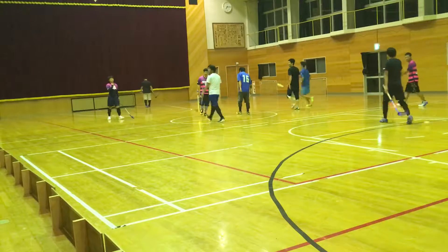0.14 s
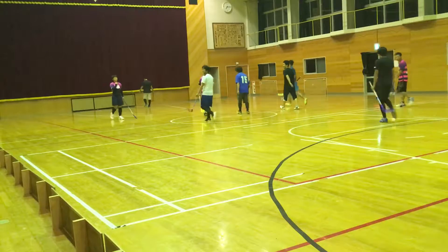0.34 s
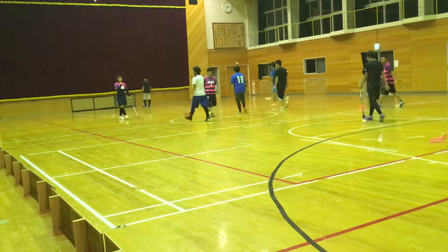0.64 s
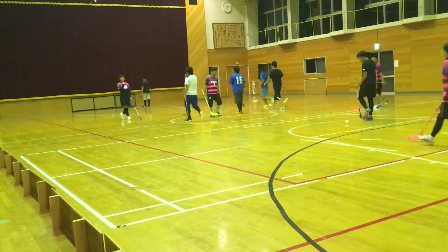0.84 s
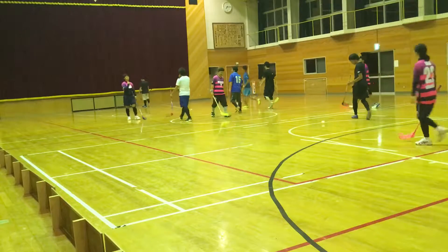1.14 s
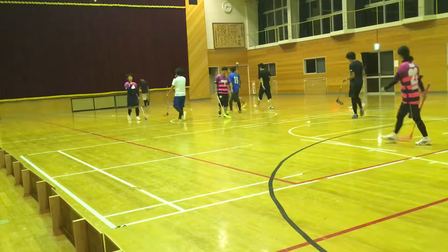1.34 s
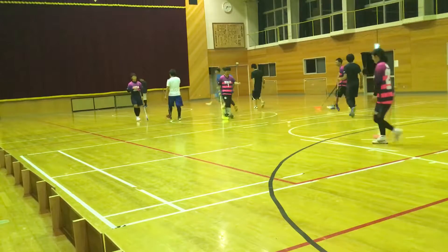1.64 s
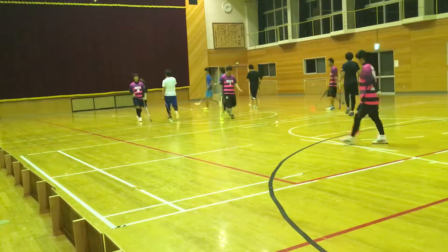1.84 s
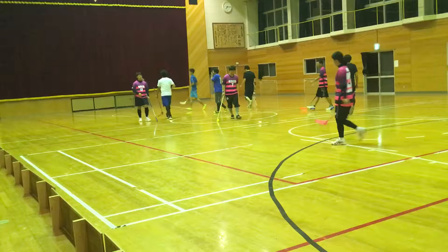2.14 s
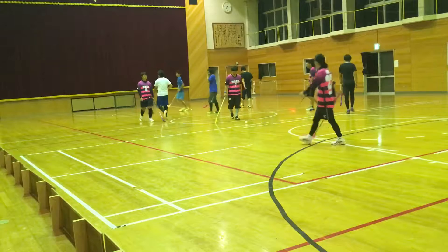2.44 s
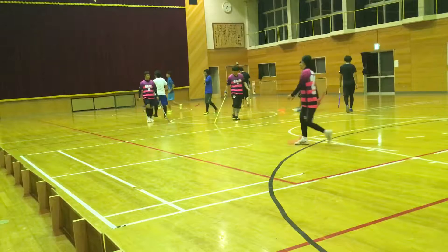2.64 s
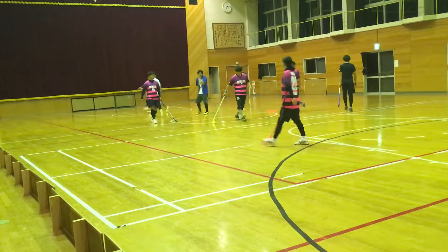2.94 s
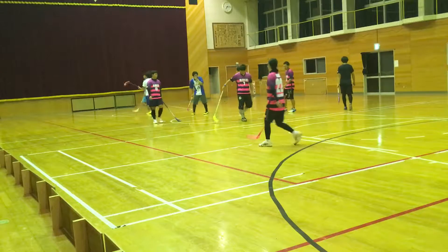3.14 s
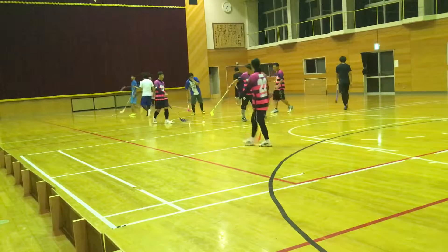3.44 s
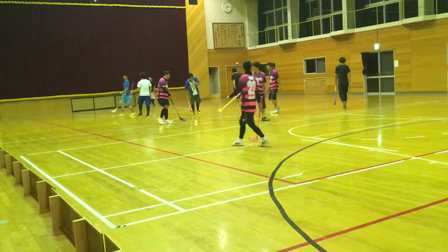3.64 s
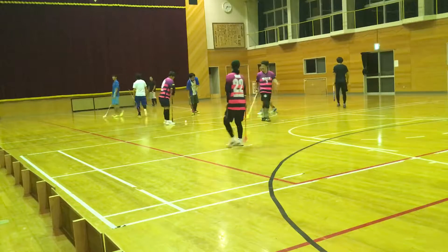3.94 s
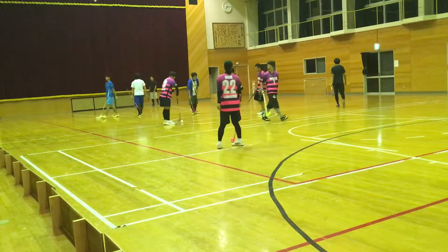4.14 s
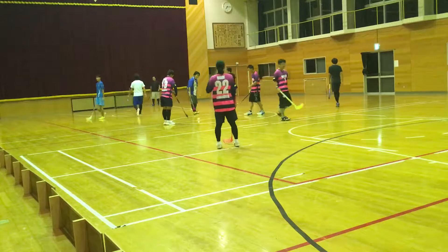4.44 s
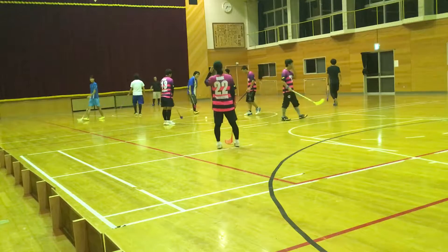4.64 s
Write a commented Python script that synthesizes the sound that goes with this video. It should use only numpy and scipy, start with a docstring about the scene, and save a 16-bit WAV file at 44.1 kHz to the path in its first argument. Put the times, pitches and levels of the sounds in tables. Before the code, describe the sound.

Courtside microphone in a wooden sports hall: a low rumble of running feet and a faint wavering wash of far play. Over it come dry plastic stick knocks, light taps, brief brushing hisses, dull booming steps and very short high sole squeaks, all ringing on in the hall. Activity is busy at first, thins in the middle, then thickens near the end.

```python
"""Floor hockey practice

Floor hockey in a large wooden gym, heard from the side of the court. The floor rumbles under many feet
and far play blurs into a wash: both are filtered noise. Brushes on the varnish and the bright edge of some
knocks are grainy hiss; low booms, mostly heavy footfalls, are unsteady tones. Sticks clack on ball and
boards as damped rings with a hard tick. Rubber soles squeak in short stick-slip chirps.
The hall rings on after squeaks, knocks, taps and hiss."""
import sys
import numpy as np
from scipy import signal
from scipy.fft import rfft, irfft, next_fast_len
from scipy.io import wavfile

SR = 44100
rng = np.random.default_rng(int(sys.argv[2]) if len(sys.argv) > 2 else 0)


def int16_out(signal):
    """Quantize to a 16-bit WAV file."""
    q = np.round(np.clip(np.atleast_2d(signal).T, -1, 1) * 32767)
    wavfile.write(sys.argv[1], SR, q.astype(np.int16))


N = 211672  # length of the scene [samples]


def gain_of(db):
    """Turns decibels into an amplitude factor."""
    return 10 ** (np.asarray(db) / 20)


def evened(x):
    """Scales a sound to rms 1."""
    return x / np.sqrt(np.mean(x ** 2) + 1e-20)


def unit_blow(x):
    """Scales a short sound to the energy of 10 ms at rms 1."""
    return x * np.sqrt(.01 * SR / np.sum(x ** 2))


def read(points, hz):
    """Reads a curve between its points, on a log-frequency axis."""
    f, value = np.transpose(points)
    return np.interp(np.log(hz + 1), np.log(f + 1), value)


def coloured(x, points):
    """Filters a sound by a spectrum in dB."""
    size = next_fast_len(len(x))
    gain = gain_of(read(points, np.fft.rfftfreq(size, 1 / SR)))
    return irfft(rfft(x, size) * gain, size)[:len(x)]


def click(points, size=2048):
    """Makes one sharp click with the given spectrum, all of its sound after the onset."""
    log_gain = np.log(gain_of(read(points, abs(np.fft.fftfreq(size, 1 / SR)))))
    return np.fft.ifft(np.exp(np.conj(signal.hilbert(log_gain)))).real


def add(mix, s, sound):
    """Mixes a sound in at time s, which may lie before the start."""
    at = round(s * SR)
    sound = sound[max(-at, 0):]
    part = mix[max(at, 0):][:len(sound)]
    part += sound[:len(part)]


def wander(size, rate_hz):
    """Makes a random curve of rms 1 that takes a new direction rate_hz times a second."""
    knots = np.arange(size) * rate_hz / SR
    return evened(np.interp(knots, np.arange(512), rng.standard_normal(512)))


# ring of the hall: (frequency [Hz], time to fall by 60 dB [s])
HALL_RING = [(100, 0.69), (500, 1.88), (1500, 1.5), (4000, 2.33), (6000, 1.8), (9000, 1.2), (15000, 1.14)]
# first reflections from floor and walls, each moved by up to 15 %: (time [s], level against the tail [dB])
FIRST_ECHOES = [(0.011, -11), (.025, -10.5), (0.074, -11.5)]


def hall_path(build_s=0.039, scatter_s=0.00055):
    """The hall from one spot: a few scattered echoes, and a dense tail that builds up and dies by band."""
    hz, t, bands = signal.stft(rng.standard_normal(3 * SR // 2), SR, nperseg=256)
    fade = gain_of(-60 * t / read(HALL_RING, hz)[:, None])
    tail = signal.istft(bands * fade, SR, nperseg=256)[1]
    tail *= 1 - np.exp(-np.arange(len(tail)) / SR / build_s)
    tail /= np.linalg.norm(tail)
    for delay, db in FIRST_ECHOES:
        echo = rng.standard_normal(256) * np.exp(-np.arange(256) / SR / scatter_s)
        add(tail, delay * rng.uniform(.85, 1.15), gain_of(db) * echo / np.linalg.norm(echo))
    return tail


def in_hall(source, hall_db, count=2, wall_delay_s=.0135, wall_db=-11):
    """Joins direct sound, one near-wall echo and hall; the random fine detail is drawn anew for each."""
    ring = sum(signal.fftconvolve(source(), hall_path()) for _ in range(count))
    heard = gain_of(hall_db) / np.sqrt(count) * ring
    add(heard, 0, source())
    add(heard, wall_delay_s, gain_of(wall_db) * source())
    return heard


# tone of the floor rumble, only its shape counts: (frequency [Hz], relative level per Hz [dB])
RUMBLE_TONE = [(10, -29), (25, -8), (40, -14.5), (60, 2), (82, 0.5), (105, -3), (150, -11), (200, -14.5),
               (260, -25), (400, -41), (900, -60)]
# tone of the wash of far play, only its shape counts: (frequency [Hz], relative level per Hz [dB])
WASH_TONE = [(100, 11), (300, 7.5), (500, -0.5), (900, 2), (1700, 0.5), (2700, 0), (3600, -5), (5000, -9.5),
             (7500, -16), (9500, -11.5), (13000, -22.5), (16000, -21)]
# loudness of the running feet, before rumble_db is added: (time [s], level [dB])
RUNNING_LEVEL = [(0.0, -37), (0.07, -29), (0.11, -37.5), (0.33, -32.5), (0.37, -35), (2.51, -36),
                 (2.52, -38.5), (3.75, -37), (4.2, -30.5), (4.26, -40.5), (4.34, -33), (4.45, -42.5),
                 (4.65, -36), (4.8, -36.5)]
# loudness of the far play, before wash_db and the waver are added: (time [s], level [dB])
FAR_PLAY_LEVEL = [(0.0, -44), (1.0, -49), (1.55, -46.5), (2.23, -47.5), (2.86, -50.5), (3.43, -51.5),
                  (4.17, -47), (4.8, -48.5)]


def background(rumble_db=1.63, wash_db=1.36, waver_db=1.38):
    """The floor rumbles under many feet; far play blurs into a wavering wash."""
    t = np.arange(N) / SR
    rumble = evened(coloured(rng.standard_normal(N), RUMBLE_TONE))
    rumble *= gain_of(rumble_db + np.interp(t, *np.transpose(RUNNING_LEVEL)))
    wash = evened(coloured(rng.standard_normal(N), WASH_TONE))
    wash *= gain_of(wash_db + np.interp(t, *np.transpose(FAR_PLAY_LEVEL)))
    return rumble + wash * gain_of(waver_db * wander(N, 19))


def small_taps(count=30, clack_db=-55, tick_db=-56, spread_db=9, hall_db=5):
    """Light touches of sticks and shoes at random times, each up to spread_db weaker, with their ring."""
    taps = np.zeros(N)
    for when, pitch, weakness in rng.random((count, 3)):
        tap = knock(clack_db, .8 + pitch, tick_db)
        add(taps, when * N / SR, gain_of(-spread_db * weakness) * tap)
    return taps + gain_of(hall_db) * signal.fftconvolve(taps, hall_path())[:N]


# tone of the fine hiss, only its shape counts: (frequency [Hz], relative level [dB])
HISS_TONE = [(2000, -35), (6000, -30), (9000, 6), (12500, 6), (15000, 6), (16000, 4)]


def hiss_burst(db, t60_s=0.063, rise_s=.001, grain_db=3):
    """Rough contact gives a brief, grainy hiss that rises fast and dies away."""
    t = np.arange(SR // 8) / SR
    grain = grain_db * wander(len(t), 590)
    shape = (1 - np.exp(-t / rise_s)) * gain_of(-60 * t / t60_s + grain)
    return gain_of(db) * unit_blow(coloured(rng.standard_normal(len(t)), HISS_TONE) * shape)


# clear bursts of high hiss: brushes on the varnish, and the bright edge of some knocks:
# (time [s], level [dB])
CLEAR_HISSES = [(0.619, -56), (.985, -50), (1.076, -47), (1.27, -57), (1.299, -47), (1.651, -48),
                (2.47, -51), (3.446, -52), (3.67, -50), (4.104, -46)]


def hisses(hall_db=-3, count=10, light_db=-57):
    """The clear bursts of hiss and some light ones at random times, with their faint ring in the hall."""
    direct = np.zeros(N)
    for s, db in CLEAR_HISSES:
        add(direct, s, hiss_burst(db))
    for when in rng.random(count):
        add(direct, when * N / SR, hiss_burst(light_db))
    return direct + gain_of(hall_db) * signal.fftconvolve(direct, hall_path())[:N]


# how long a low boom lasts: (frequency [Hz], time to fall by 60 dB [s])
BOOM_TIME = [(80, 0.35), (185, 1.12), (290, 0.17), (390, 1.13)]


def low_boom(db, hz, rise_s=0.016, spread=0.086):
    """A tone of unsteady pitch that swells and dies, as when a foot loads the sprung boards."""
    t = np.arange(SR) / SR
    unsteady_hz = hz * (1 + spread * wander(SR, 42.8))
    tone = np.sqrt(2) * np.sin(2 * np.pi * np.cumsum(unsteady_hz) / SR)
    return tone * (1 - np.exp(-t / rise_s)) * gain_of(db - 60 * t / read(BOOM_TIME, hz))


# low booms: most are heavy footfalls, a few are fainter wandering tones at 290 to 400 Hz:
# (time [s], level [dB], middle pitch [Hz])
LOW_BOOMS = [(.2, -48, 400), (.296, -22, 76.3), (0.405, -32.5, 287.5), (1.268, -25.5, 85),
             (1.83, -37, 176.5), (1.904, -29, 81.3), (2.09, -24.5, 79.8), (2.63, -34, 180.2),
             (3.03, -27.5, 80.4), (3.259, -40, 166.7), (3.988, -23, 71.7), (4.137, -22.5, 80.4),
             (4.141, -37.5, 184), (4.149, -42, 399.7), (4.643, -20.5, 76.7)]


def add_low_booms(mix):
    """Plays the low booms, without hall."""
    for s, *boom in LOW_BOOMS:
        add(mix, s, low_boom(*boom))


def struck(modes, pitch, t):
    """Rings damped modes; each blow lands on another spot, which detunes and weighs them a little."""
    hz, db, t60 = np.transpose(modes)[:, :, None]
    detune, weight = rng.standard_normal((2, len(modes), 1))
    direction = rng.choice([-1, 1], hz.shape)
    swing = direction * np.sin(2 * np.pi * hz * pitch * (1 + 0.039 * detune) * t)
    return unit_blow(np.sum(gain_of(db + 2.0 * weight - 60 * t / t60) * swing, 0))


# hollow plastic blade and ball:
# (frequency before the pitch factor [Hz], relative level [dB], time to fall by 60 dB [s])
BLADE_RING = [(1030, 0, 0.02), (1382, -5.5, 0.028), (1628, -1.5, 0.038), (1923, 1, 0.039),
              (2313, 0.5, 0.012), (2710, 1, 0.013), (3355, 0.5, 0.01)]
# boards and shaft under a blow:
# (frequency before the pitch factor [Hz], relative level [dB], time to fall by 60 dB [s])
BOARD_RING = [(291, -2, 0.056), (424, -2.5, 0.031), (519, 0, 0.021), (640, -3, 0.037), (797, 0, 0.021)]
# tone of hard contact, only its shape counts: (frequency [Hz], relative level [dB])
TICK_TONE = [(1000, -22), (3000, -16), (6000, 8.5), (9000, 5), (13000, 3.5), (16000, -11)]


def knock(clack_db, pitch, tick_db, snap_db=-6, grit_db=-2, grit_t60=0.016,
          rattle_db=-5, rattle_t60=0.068, buzz_db=-7, buzz_t60=0.093):
    """A hard gritty tick and a brief rattle, with the ring of the plastic blade and of the boards."""
    t = np.arange(SR // 8) / SR
    grit, hiss, buzz = rng.standard_normal((3, len(t)))
    contact = gain_of(grit_db) * unit_blow(coloured(grit, TICK_TONE) * gain_of(-60 * t / grit_t60))
    contact += gain_of(rattle_db) * unit_blow(coloured(hiss, TICK_TONE) * gain_of(-60 * t / rattle_t60))
    add(contact, 0, gain_of(snap_db) * unit_blow(click(TICK_TONE)))
    # the blade chatters on after the first contact
    chatter = signal.fftconvolve(struck(BLADE_RING, pitch, t), buzz * gain_of(-60 * t / buzz_t60))[:len(t)]
    blade = struck(BLADE_RING, pitch, t) + gain_of(buzz_db) * unit_blow(chatter)
    # the boards give -49 dB for a soft clack of -45 dB, and follow 0.4 of every dB more
    board_db = -49 + .4 * (clack_db + 45)
    boards = gain_of(board_db) * struck(BOARD_RING, 0.933, t)
    return gain_of(tick_db) * contact + gain_of(clack_db) * blade + boards


# one row a blow of stick or ball:
# (time [s], clack level [dB], pitch factor [1], sharp tick level [dB], hall level [dB])
BLOWS = [ (0.1088, -46, 1.03, -55, 2), (0.3923, -43, 0.91, -46.5, 5.5), (.4160, -44, 1.63, -51, -0.5),
         (0.5904, -58, 1.56, -49.5, -1), (.7538, -54, 1.3, -54, -6), (0.8618, -50, 1.11, -52, 5.5),
         (.985, -45.5, 0.47, -61, 5), (1.0458, -45.5, 0.69, -56, -12), (1.2193, -60.5, 0.62, -73, 15),
         (1.2989, -42, 1.35, -44, 3), (1.3468, -37, 0.84, -44, -6), (1.5580, -80, 2.2, -43, -3),
         (1.7877, -48.5, 0.98, -55.5, 10), (2.3934, -47, 1.26, -50, 5.5), (2.5307, -51, 0.73, -50.5, -1),
         (2.5872, -65, 1.1, -46, 0.5), (2.615, -32.5, 0.89, -42, -2.5), (2.6821, -47.5, 1.1, -49, 4),
         (2.9458, -53.5, 1.09, -54.5, 11.5), (3.1386, -47.5, .9, -58.5, 6.5),
         (3.4837, -46.5, 1.3, -49.5, 6), (3.5615, -52.5, .6, -55, 6), (3.8049, -54.5, 1.28, -55, 3),
         (3.9332, -49, 0.64, -67, 3.5), (3.9790, -43, 1, -58, -2.5), (4.0503, -52.5, 1.66, -52.5, 9),
         (4.104, -37, 0.83, -43.5, 4.5), (4.1178, -46.5, 1.87, -45.5, 5), (4.1900, -40.5, .8, -54, 0),
         (4.2599, -43.5, 1.65, -45.5, 4), (4.6160, -46, 0.71, -65, 5.5), (4.6711, -50.5, 1.42, -51, 7), ]


def add_knocks(mix):
    """Plays each blow of stick or ball in the hall."""
    for s, *blow, hall_db in BLOWS:
        add(mix, s, in_hall(lambda: knock(*blow), hall_db))


def squeak(length, db, start_hz, drop, octave_db, jitter, flutter_db=1.0, third_db=-10, fourth_db=-16,
           bite_db=7, bite_s=0.0042, unrest_hz=900, slide_fade_db=2):
    """The tread sticks and slips thousands of times a second; the pitch drifts by drop and jitters with load."""
    t = np.arange(int(max(length, .002) * SR)) / SR
    along = t / t[-1]  # 0 to 1 over the chirp
    unrest = wander(len(t), unrest_hz)
    # the pitch sags as the foot slows; a negative drop makes it rise
    hz = start_hz * (1 - drop * along) * (1 + jitter * (unrest - unrest.mean()))
    phase = 2 * np.pi * np.cumsum(hz) / SR
    upper_db = min(octave_db, -16)
    overtones_db = [octave_db, upper_db + third_db, upper_db + fourth_db]
    overtones = sum(gain_of(level) * np.sin(k * phase)
                    for k, level in enumerate(overtones_db, 2) if k * start_hz < SR / 2)
    bite = gain_of(bite_db * np.exp(-t / bite_s))  # the first slips are the harshest
    grip = np.clip(np.minimum(t, t[-1] - t) / .0006, 0, 1)  # fades in and out over 0.6 ms
    # the squeak weakens as the foot slows
    level = gain_of(db - slide_fade_db * along + flutter_db * wander(len(t), 562))
    return np.sqrt(2) * (np.sin(phase) + bite * overtones) * grip * level


# one row a chirp of a sole; a long skid or glide takes several rows:
# (time [s], length [s], level before fade and flutter [dB], start pitch [Hz],
# pitch drop [share], octave level before the bite [dB], pitch jitter [share], hall level [dB])
CHIRPS = [ (-.17, 0.058, -39.5, 2980, 0.041, -15.5, 0.028, -0.5),
          (.206, 0.012, -31, 4430, 0.016, -21, 0.033, -1), (0.974, 0.037, -48, 4900, .07, -5, 0.023, 5),
          (1.014, 0.022, -47.5, 4880, 0.064, 5.5, .006, -12),
          (1.036, 0.025, -48, 5280, 0.055, -20, 0.025, -1),
          (1.062, 0.028, -41.5, 4930, 0.054, -6.5, .018, -5),
          (1.106, 0.0193, -42, 4760, 0.016, -28, 0.021, 1.5),
          (2.3406, 0.011, -21, 3970, -0.024, -21.5, 0.043, -5.5),
          (3.548, 0.068, -54, 2750, 0.086, -33, 0.016, 3),
          (3.757, 0.077, -57.5, 2043, 0.051, -18, 0.047, 4),
          (3.973, 0.036, -49.5, 4870, .05, -5, 0.087, 4.5), (4.118, .009, -45, 2900, -0.11, -22, .05, -10),
          (4.1368, 0.015, -25, 4515, 0.061, -19, 0.02, -7),
          (4.151, 0.022, -37.5, 4170, .1, -8, 0.029, -1.5),
          (4.167, .018, -48.5, 4570, 0.144, 3.5, 0.032, -1),
          (4.441, 0.032, -49, 6250, 0.05, -12, 0.027, -5), ]


def add_squeaks(mix):
    """Plays each chirp of a rubber sole in the hall."""
    for s, *slip, hall_db in CHIRPS:
        add(mix, s, in_hall(lambda: squeak(*slip), hall_db))


def scene():
    """Low booms, knocks and squeaks over the background, the small taps and the bursts of hiss."""
    mix = background() + small_taps() + hisses()
    add_low_booms(mix)
    add_knocks(mix)
    add_squeaks(mix)
    return mix[None]


# microphone colour, with a notch from its port: (frequency [Hz], level [dB])
MIC_TONE = [(20, -1.5), (9600, -1), (10000, -1), (10400, -6), (11100, 0), (16000, 1.5)]


def record(dry):
    """Gives the sound its microphone colour, then removes what lies above about 16 kHz."""
    low_pass = signal.firwin(511, 16050, window=("kaiser", 9), fs=SR)
    return signal.oaconvolve(coloured(dry[0], MIC_TONE), low_pass, "same")[None]


dry = scene()
out = record(dry)
int16_out(out)
```